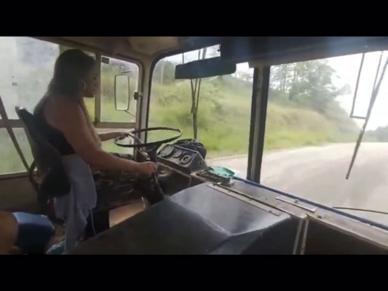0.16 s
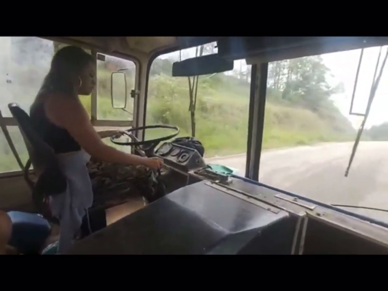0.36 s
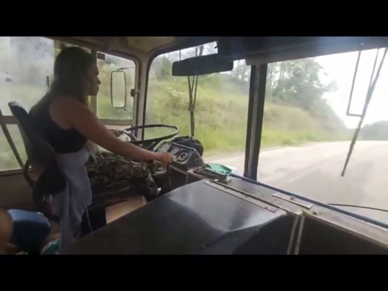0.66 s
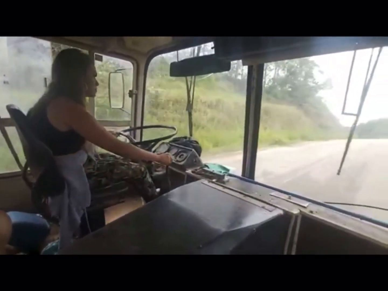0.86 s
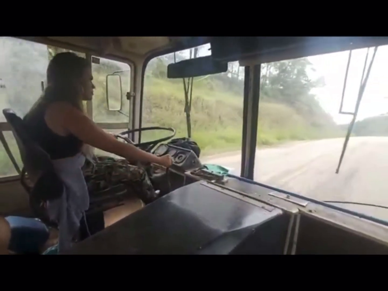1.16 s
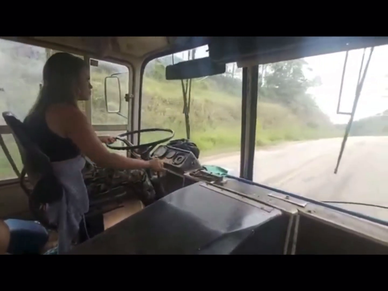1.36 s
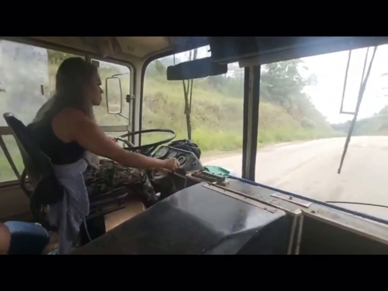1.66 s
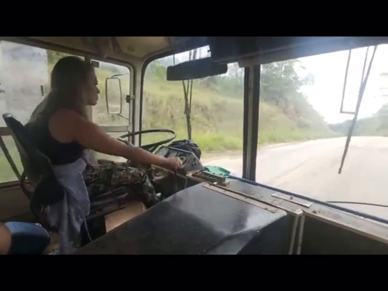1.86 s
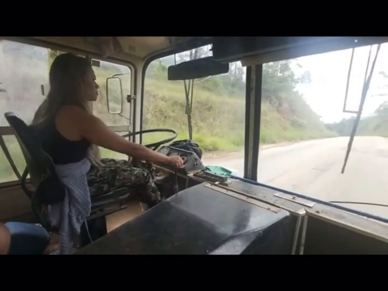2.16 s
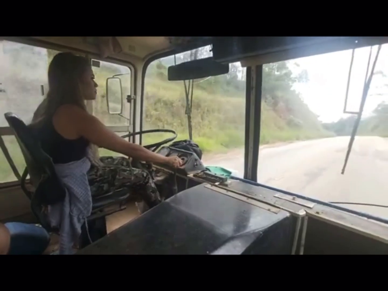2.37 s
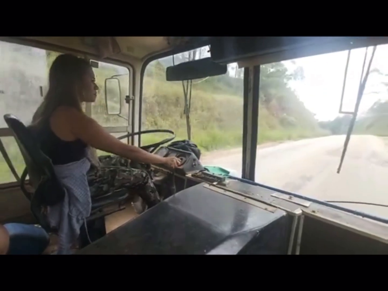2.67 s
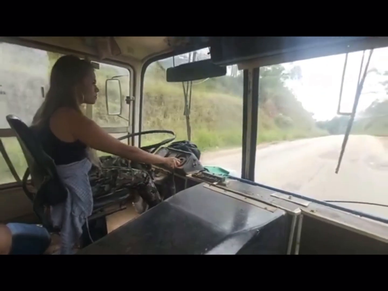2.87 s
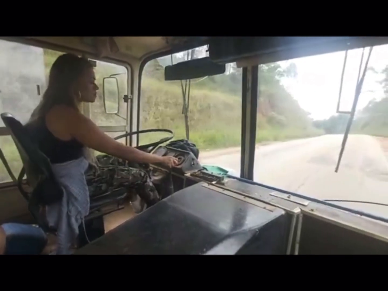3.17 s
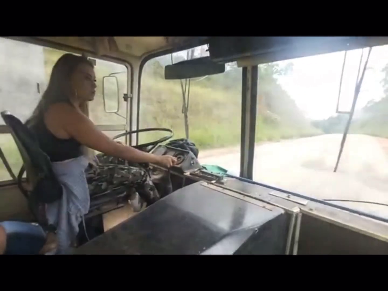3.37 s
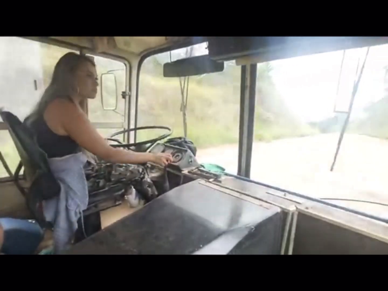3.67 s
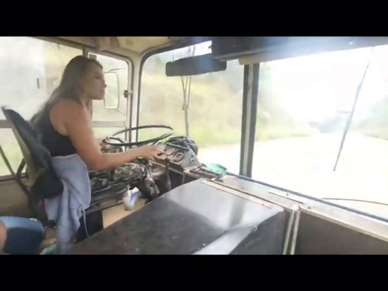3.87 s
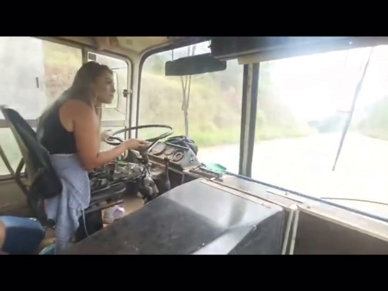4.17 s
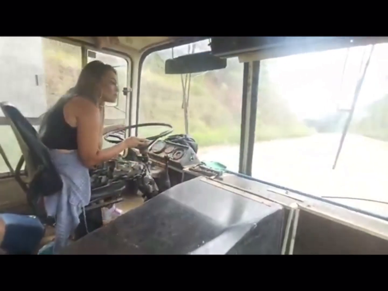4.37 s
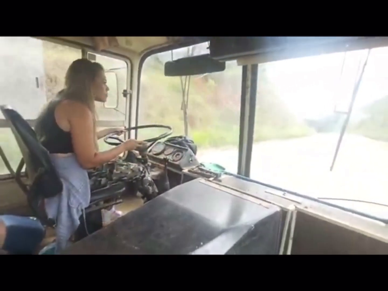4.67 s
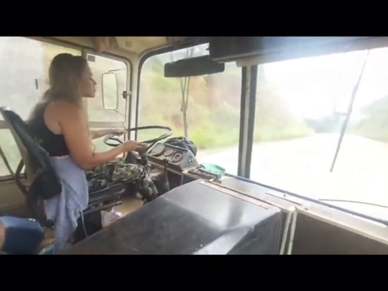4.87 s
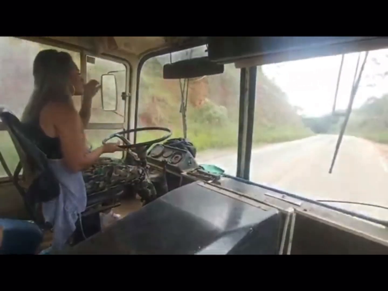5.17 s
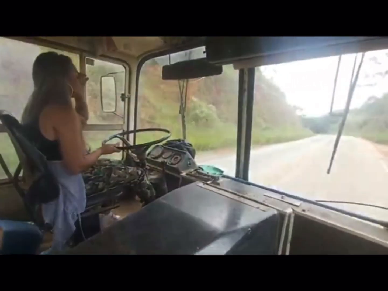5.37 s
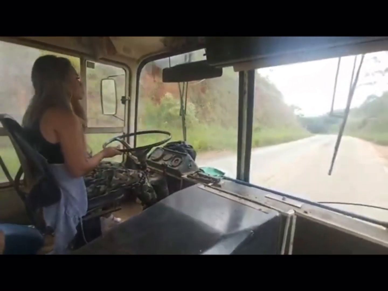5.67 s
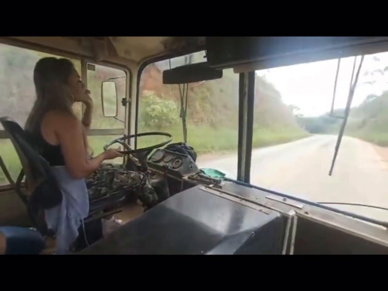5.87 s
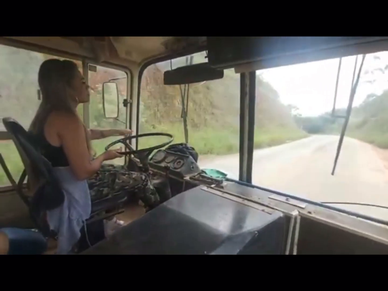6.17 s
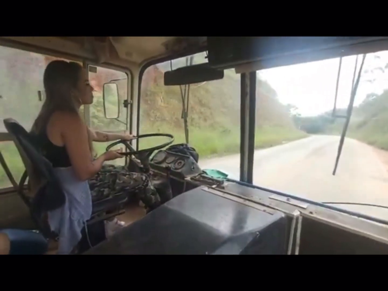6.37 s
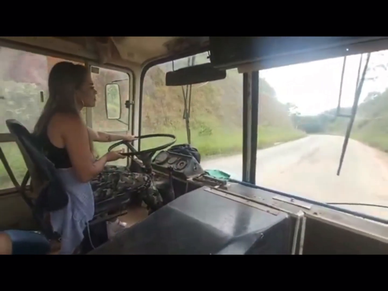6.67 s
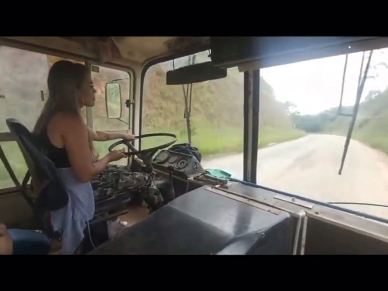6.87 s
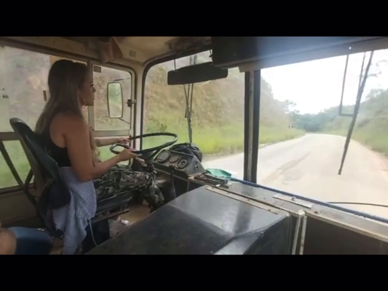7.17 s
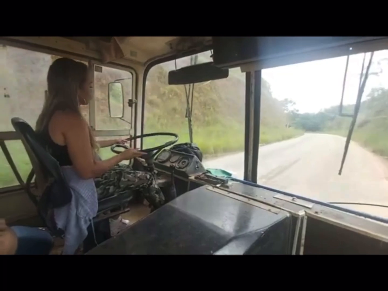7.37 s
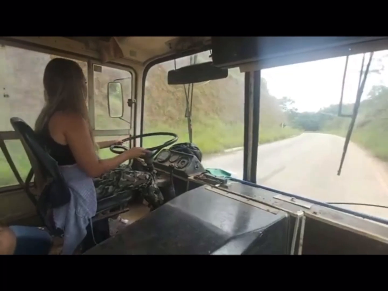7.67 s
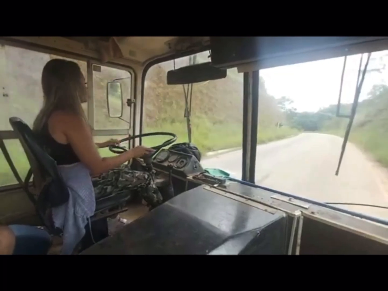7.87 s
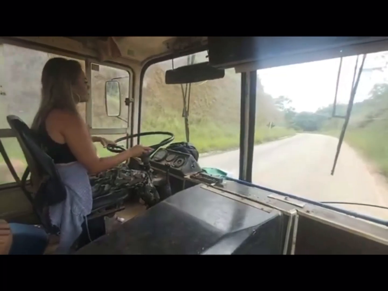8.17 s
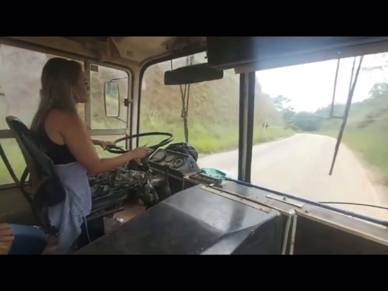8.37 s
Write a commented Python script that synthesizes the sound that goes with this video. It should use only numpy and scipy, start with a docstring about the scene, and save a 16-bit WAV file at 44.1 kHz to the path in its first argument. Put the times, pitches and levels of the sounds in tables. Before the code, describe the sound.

An old bus engine drones and clatters beside the listener in a boomy cab. Its pitch falls for about two seconds, nearly idling, then jumps up as drive returns and slowly rises, louder and rougher. Ruts thump through the floor, a panel clangs midway, and fittings, windows and airy trim rattle above constant road rumble. Close interior stereo pickup with deep bass and diffuse treble.

```python
"""Inside the cab of an old six-cylinder diesel bus on a rough road: the revs fall for a gear change,
the engine takes up the load again and pulls slowly faster. Engine orders are sines that swell at cab
resonances; knock is noise bursts at the firing rate under a resonant cover. Fan, tyres and trim are shaped
noise; ruts and panes ring decaying modes; fittings clatter in noise bursts; faint narrow tones come and go."""
import sys
import numpy as np
from scipy import signal
from scipy.fft import rfft, irfft
from scipy.io import wavfile
from scipy.ndimage import uniform_filter1d

SR = 44100
rng = np.random.default_rng(int(sys.argv[2]) if len(sys.argv) > 2 else 0)


def waveform_to_disk(signal):
    """Save audio, clipped to [-1, 1], as 16-bit WAV at the path in sys.argv[1]."""
    frames = np.transpose(np.atleast_2d(signal))
    scaled = np.clip(frames, -1, 1) * 32767
    samples = np.round(scaled).astype(np.int16)
    wavfile.write(sys.argv[1], SR, samples)


N = 375291
TIME = np.arange(N) / SR  # s
HZ = np.fft.rfftfreq(N, 1 / SR)

# Engine speed falls for the gear change, flares, settles as the clutch bites, then climbs.
# Each row: time in seconds, engine cycles per second (six firings make a cycle).
ENGINE_SPEED = [(0, 18.33), (.2, 17.89), (.6, 14.6), (1, 11.91), (1.25, 10.41), (1.5, 9.35), (1.75, 8.59),
                (2, 7.5), (2.15, 7.6), (2.3, 10.2), (2.5, 11.85), (2.66, 12.1), (2.8, 10.6), (3.03, 10.25),
                (3.3, 10.9), (4.3, 11.67), (6.3, 13.38), (7.3, 14.4), (7.9, 14.94), (8.51, 15.7)]
# The pedal lifts for the gear change and goes down again. Each row: time in seconds, engine load in dB.
ENGINE_LOAD = [(0, -4.5), (.36, -9), (.7, -11), (1.35, -20.5), (1.6, -14), (2.0, -13.5), (2.2, -3.5),
               (2.45, 1.5), (2.7, 1), (4.5, -0.5), (7.0, 0.95), (8.15, 1.6), (8.51, 0)]
# How hard the road shakes the bus. Each row: time in seconds, shaking in dB.
ROAD_SHAKE = [(0, 1), (.4, 1), (.56, -3.5), (1.3, -2), (1.6, 1), (2.15, -1), (2.55, 1), (3.2, 0), (3.9, 1),
              (4.3, 1), (5.5, 2.3), (6.5, 0), (7.5, 0.5), (8.51, 2.4)]
# Engine orders, the strong ones and those that uneven cylinders fill in, at 0 dB load and cruising speed.
# Each row: multiple of the cycle rate, rms level off resonance in dB, dB per dB of load,
# dB per doubling of speed.
ENGINE_ORDERS = [(3, -45, .3, 22), (6, -35.5, 0, 12), (7, -37, .8, 0), (8, -39, .5, 5), (9, -35, 0, 13),
                 (10, -39, .8, 0), (11, -40, .8, 0), (12, -37, .1, 0), (14, -43, .5, 8),
                 (15, -36.5, .4, -3), (17, -41, .8, 3), (18, -39.5, .4, 5), (20, -43, .8, 5),
                 (21, -40, .7, -4), (23, -39, .9, -2), (24, -43, .8, 0), (25, -42, .7, 3), (26, -44, .7, 4),
                 (28, -42, .7, -4), (30, -41, .7, 0)]
# Air resonances of the cab; a negative lift is a dead spot.
# Each row: centre in Hz, width in Hz, lift in dB, lowest order driven, highest order driven.
CAB_MODES = [(82.5, 5, 8, 6, 6), (87, 3, -10, 6, 6), (92.5, 7, 9, 6, 7), (91, 6, 5, 7, 7),
             (107, 13, 9.5, 6, 6), (108, 11, 13, 8, 8), (114, 5, 7, 9, 9), (128.5, 8, 11.5, 9, 9),
             (139, 6, 7.5, 9, 9), (123.5, 6, 12, 10, 10), (130, 9, 10, 10, 10), (137, 5, 8, 10, 10),
             (128.5, 6, 12, 11, 11), (137, 22, 12, 11, 11), (125, 14, 16, 12, 12), (134.5, 6, 7.5, 12, 12),
             (143, 10, 15.5, 12, 12), (149.5, 4, 5, 12, 12), (178, 22, 7, 12, 12), (168, 18, 12, 15, 15),
             (199, 8, 9, 18, 18), (229, 16, 6, 15, 21), (249, 11, 14, 23, 24), (286, 11, 14, 21, 21),
             (289, 9, 12.5, 23, 23), (298, 7, 12, 25, 28), (305, 14, 18.5, 23, 23), (323, 7, 13, 23, 23),
             (408, 22, 11, 26, 30), (411, 12, 6.5, 30, 30)]
# Spectrum of the knock. Each row: frequency in Hz, relative level in dB per Hz.
KNOCK_SPECTRUM = [(60, -39), (150, -0.5), (250, 5), (400, 2.5), (580, -2), (1000, 0), (1450, -5.5),
                  (2000, -6.5), (3000, -11), (4000, -22), (5500, -24.5), (9000, -25), (15000, -47)]
# Resonances of the engine cover. Each row: centre in Hz, width in Hz, lift in dB.
COVER_MODES = [(748, 22, 4.5), (835, 12, 8.5), (952, 84, -2.5), (1082, 120, 3), (1219, 78, 7),
               (1348, 55, 5.5), (1456, 67, 1.5), (1666, 44, 7.5), (1850, 110, 7.5), (2040, 120, 6),
               (2194, 51, 3.5), (2506, 27, 9.5), (2720, 45, 3.5)]
# Spectrum of the cooling fan. Each row: frequency in Hz, relative level in dB per Hz.
FAN_SPECTRUM = [(100, -11), (500, -8), (1100, -20), (2100, 3.5), (2800, 6.5), (3500, -1), (4300, -1),
                (5500, -5.5), (9000, -43), (15000, -36)]
# Spectrum of the tyre and body rumble. Each row: frequency in Hz, relative level in dB per Hz.
ROAD_SPECTRUM = [(15, -32), (30, -23), (46, -8), (70, -5), (100, 0), (135, -1.5), (200, -7.5), (300, -8),
                 (430, -11.5), (900, -20), (2000, -26), (4000, -31.5), (8000, -43), (11500, -45),
                 (15000, -55)]
# Ruts that thump through the floor.
# Each row: start in seconds, peak level in dB, hardness in dB per octave.
FLOOR_THUMPS = [(1.208, -15, -8), (1.622, -10, 6), (1.696, -15, -4), (1.796, -12, 0), (2.508, -7, 4),
                (3.019, -9, 2), (3.793, -8, 7), (4.152, -13, 12), (4.222, -6, 5), (4.317, -12, 14),
                (4.654, -5.5, 5), (4.831, -11, 14), (5.078, -11, -2), (5.332, -10, 26), (5.403, -9, -13),
                (5.528, -11, 4), (5.746, -6, -1), (6.399, -9, -3), (6.496, -11, -2), (6.615, -12, 2),
                (6.76, -14, 5)]
# Modes of the floor. Each row: frequency in Hz, level before the hardness tilt in dB,
# 60 dB decay time in seconds.
FLOOR_MODE_TABLE = [(58, -22, 0.075), (85, 3.5, 0.14), (128, 14.5, 0.053), (218, 1.5, 0.054)]
# Loose fittings that clatter on bumps.
# Each row: start in seconds, level before a common trim in dB, centre in Hz, 60 dB decay time in seconds.
FITTING_CLATTERS = [(0.4, -25, 11400, 0.15), (1.108, -32, 3800, .06), (1.25, -33, 4500, 0.074),
                    (1.518, -31, 4200, .06), (1.552, -35, 7000, .2), (1.607, -28, 4500, .08),
                    (1.641, -30, 3900, .06), (1.746, -34, 3900, .05), (1.778, -29, 3900, .05),
                    (1.8, -28, 4500, .1), (1.888, -34, 9000, .18), (1.957, -27, 4250, 0.066),
                    (2.256, -29, 3400, .06), (2.422, -27, 5000, .1), (2.482, -33, 8000, .2),
                    (2.551, -23, 4800, .1), (4.149, -18.5, 5540, 0.16), (4.152, -20, 1800, .07),
                    (4.188, -27, 5600, .15), (4.861, -31, 10000, .2), (5.025, -28, 8500, .2),
                    (5.634, -26, 7000, .16), (5.812, -26, 8500, 0.11), (5.885, -30, 8500, .1),
                    (6.291, -26, 6000, .1)]
# A loose metal part chinks while the engine coasts. Each row: start in seconds, level before trim in dB.
METAL_CHINKS = [(1.1294, -28), (1.3603, -28), (1.4661, -28), (1.688, -29), (1.8044, -29), (1.9305, -24),
                (2.0644, -29), (2.1969, -25)]
# Modes of the metal part. Each row: frequency in Hz, relative level in dB, 60 dB decay time in seconds.
METAL_MODES = [(1740, 1.5, 0.08), (1880, -6, .055), (2900, -12, 0.055)]
# A body panel rings on a bump and its rebound. Each row: start in seconds, level before trim in dB.
PANEL_BUMPS = [(4.15, -16), (4.199, -22.5)]
# Modes of the panel. Each row: frequency in Hz, relative level in dB, 60 dB decay time in seconds.
BODY_PANEL_MODES = [(530, -3, 0.46), (680, -4, 0.13), (810, 2, .13), (985, -5, 0.13), (1220, -6, .14)]
# Modes of the window panes.
# Each row: nominal frequency in Hz, relative level in dB, 60 dB decay time in seconds.
WINDOW_MODES = [(1800, -1, 0.062), (2850, -1, 0.049), (3900, -5, 0.031), (4510, -6, 0.056),
                (6820, -11, .03)]
# Spectrum of rushing air and trim. Each row: frequency in Hz, relative level in dB per Hz.
HISS_SPECTRUM = [(1500, -24), (3000, 6), (4300, 4), (5600, -0.5), (6900, 5.5), (8200, -5), (9000, -3),
                 (10500, -5), (11800, -2.5), (12900, -7.5), (15000, -17)]
# Brief resonances, low groans and thin whistles.
# Each row: start in seconds, length in seconds, centre in Hz, width in Hz, rms level before the fades in dB.
BRIEF_TONES = [(0, 0.37, 4240, 180, -44), (1.2, 0.18, 9100, 400, -55), (1.62, 0.49, 316, 8, -33.5),
               (1.89, 0.11, 280, 12, -26), (2.58, 0.27, 328, 11, -28), (2.7, 0.84, 7120, 130, -48),
               (2.4, 1.25, 250, 67, -25), (6.7, 0.54, 865, 32, -29), (6.72, 0.41, 1215, 47, -30.5),
               (7.75, 0.57, 1206, 91, -31)]
# Likeness of the two sides. Each row: frequency in Hz, left-right correlation.
LIKENESS = [(40, .95), (130, .96), (290, .7), (630, .42), (1300, -.1), (2500, .05), (14000, 0)]
# Balance of the two sides. Each row: frequency in Hz, left minus right in dB.
BALANCE = [(60, 6), (110, -1.5), (200, 3), (370, 0.5), (690, 1), (1260, 1), (2320, 4), (4270, 3.5),
           (7850, 3.5), (14400, -1)]

CRUISE = 12  # reference speed in engine cycles per s
# knock level at 0 dB load and cruising speed; it follows the load dB for dB
KNOCK_DB, KNOCK_DB_PER_DOUBLING = -20.5, 4.5
LOOSE = .45  # share of the knock's drive power that is fresh noise rather than repeated blows
SCATTER_DB = 1.7  # rms difference in strength from one blow to the next
ROAD_DB = -20.3  # rumble level at 0 dB shaking
# trim and windows rattle with the engine's load and speed and with the road
HISS_DB, HISS_PER_LOAD, HISS_PER_SHAKE, HISS_DB_PER_DOUBLING = -35, 1, 0.65, 3.5
# the panes chatter louder as the road gets rougher
PANES_DB, PANES_PER_SHAKE = -44, 1.5
EDGE_HZ = 14950  # upper band limit


def amp(db):
    """Level to pressure ratio: 20 dB is a factor of ten."""
    return 10 ** (np.asarray(db) / 20)


def evened(x):
    """Normalisation of mean power: the signal is scaled to rms 1."""
    return x / np.sqrt(np.mean(x ** 2) + 1e-20)


def read(points, hz=HZ):
    """Logarithmic frequency scale: a spectrum table is interpolated between its points."""
    f, value = np.transpose(points)
    return np.interp(np.log(hz + 1), np.log(f + 1), value)


def curve(table):
    """Linear interpolation: a time table becomes one value per sample."""
    s, value = np.transpose(table)
    return np.interp(TIME, s, value)


def add(mix, s, sound):
    """Superposition: a stereo sound is summed into the mix from time s in seconds."""
    part = mix[:, max(round(s * SR), 0):][:, :sound.shape[1]]
    part += sound[:, :part.shape[1]]


def wander(per_s):
    """Low-passed random process: smooth chance of about rms 1, changing about per_s times a second."""
    coarse = np.linspace(0, TIME[-1], 2048)
    f = np.fft.rfftfreq(len(coarse), coarse[1])
    slow = irfft(rfft(rng.standard_normal(len(coarse))) * np.exp(-(f / per_s) ** 2))
    return np.interp(TIME, coarse, evened(slow))


def lift(resonances, hz):
    """Resonance curves: the decibels that a set of modes adds at the given frequencies."""
    return sum(db / (1 + (2 * (hz - centre) / width) ** 2) for centre, width, db in resonances)


def in_cab(pair, colour_db):
    """Interaural coherence: bass is much alike on both sides, treble is diffuse and mostly leans left."""
    a, b = rfft(pair)
    same = np.clip(read(LIKENESS), -1, 1)
    lean = amp(read(BALANCE) / 2)
    mid = a * np.sqrt((1 + same) / 2)
    side = b * np.sqrt((1 - same) / 2)
    sides = np.array([(mid + side) * lean, (mid - side) / lean])
    return evened(irfft(sides * amp(colour_db), N))


def boom(cycles, speed, load_db):
    """Order excitation: multiples of the cycle rate drone, swelling as they glide through cab resonances."""
    out, doublings = np.zeros((2, N)), np.log2(speed / CRUISE)
    for k, db, per_load, per_doubling in ENGINE_ORDERS:
        driven = [mode for *mode, lowest, highest in CAB_MODES if lowest <= k <= highest]
        # a resonance takes time to build, so a quick glide passes through it smoothly
        swell_db = uniform_filter1d(np.zeros(N) + lift(driven, k * speed), size=8000)
        line_db = db + per_load * load_db + per_doubling * doublings + swell_db
        # higher orders arrive less in step at the two sides (phase in radians)
        apart = k / 60 * rng.choice([-1, 1]) * np.array([[1], [-1]])
        line = np.sqrt(2) * np.sin(2 * np.pi * (k * cycles + rng.random()) + apart)
        waver_db = .7 * wander(4)
        out += amp(line_db + waver_db) * line
    return out * amp([[.7], [-.7]])  # slightly stronger on the left


def knock(cycles, ring_s=0.015, uneven_db=0.28, burst=0.58, count=6):
    """Impulsive excitation: cylinders strike the block, each with its own ring, amid combustion noise."""
    firing = np.floor(cycles * count).astype(int)
    at = np.flatnonzero(np.diff(firing)) + 1
    strength = amp(uneven_db * evened(rng.standard_normal(count)))
    force = amp(SCATTER_DB * rng.standard_normal(N))[at]
    t = np.arange(4096) / SR
    blows = np.zeros((2, N))
    for cylinder in range(count):
        train = np.zeros(N)
        train[at] = force * strength[cylinder] * (firing[at] % count == cylinder)
        # worn injectors and pistons make each cylinder knock a little late
        age = np.maximum(t - rng.uniform(0, .006), 0)
        # the ring swells in a moment and dies away in two parts, the weaker one a little sooner
        rise = 1 - np.exp(-age / 0.0027)
        decay = np.exp(-age / ring_s) + 0.12 * np.exp(-age / 0.013)
        ring = rng.standard_normal((2, len(t))) * rise * decay
        blows += signal.oaconvolve(train[None], ring, axes=1)[:, :N]
    blows = signal.sosfilt(signal.butter(2, 260, "high", fs=SR, output="sos"), blows)
    # steady noise plus a puff that fades over the fraction "burst" of a firing interval
    phase = cycles * count % 1
    puffs = rng.standard_normal((2, N)) * strength[firing % count] * (2.1 + np.exp(-phase / burst))
    drive = np.sqrt(1 - LOOSE) * evened(blows) + np.sqrt(LOOSE) * evened(puffs)
    return cover_wavers(in_cab(drive, read(KNOCK_SPECTRUM) + lift(COVER_MODES, HZ)))


def cover_wavers(pair, waver_db=1.5, per_s=7):
    """Modal fluctuation: each resonance of the engine cover's loose panels rises and sinks in its own time."""
    hz, t, z = signal.stft(pair, SR, nperseg=1024)
    bands = np.array([lift([(centre, width, 1)], hz) for centre, width, _ in COVER_MODES])
    swells = rng.standard_normal((len(COVER_MODES), len(t)))
    smooth = np.exp(-(np.fft.rfftfreq(len(t), t[1]) / per_s) ** 2)
    swells = evened(irfft(rfft(swells) * smooth, len(t)))
    wavered = z * amp(waver_db * bands.T @ swells)
    return evened(signal.istft(wavered, SR, nperseg=1024)[1][:, :N])


def fan(speed, top_db=-30, steepness=3.4):
    """Aerodynamic noise: the cooling fan's rush grows as a steep power of engine speed."""
    gain = amp(top_db) * (speed / speed.max()) ** steepness
    return gain * in_cab(rng.standard_normal((2, N)), read(FAN_SPECTRUM))


def thumps(rise_s=0.0043):
    """Modal response to a push: ruts make low floor modes throb; hardness tilts the balance of the modes."""
    out, t = np.zeros((2, N)), np.arange(SR // 4) / SR
    for s, peak_db, hardness in FLOOR_THUMPS:
        ring = np.zeros(len(t))
        for hz, db, t60 in FLOOR_MODE_TABLE:
            mode_db = db + hardness * np.log2(hz) - 60 * t / t60
            ring += amp(mode_db) * np.sin(2 * np.pi * hz * t)
        ring *= 1 - np.exp(-t / rise_s)
        add(out, s, amp(peak_db) * np.array([ring, ring]) / abs(ring).max())
    return out


def road(jolt_db=1.47):
    """Random excitation: the uneven surface jolts the rumble of tyres and body."""
    jolted = rng.standard_normal((2, N)) * amp(jolt_db * wander(19.6))
    return in_cab(jolted, read(ROAD_SPECTRUM))


def clatters(octaves=0.53, level_db=-2):
    """Band-limited impact noise: each loose fitting gives a quickly dying burst around its own centre."""
    out, t = np.zeros((2, N)), np.arange(SR // 2) / SR
    f = np.fft.rfftfreq(len(t), 1 / SR) + 1
    for s, db, hz, t60 in FITTING_CLATTERS:
        band = np.exp(-(np.log2(f / hz) / octaves) ** 2 / 2)
        burst = evened(irfft(rfft(rng.standard_normal((2, len(t)))) * band, len(t)))
        rise = 1 - np.exp(-t / .004)
        add(out, s, burst * amp(db + level_db - 60 * t / t60) * rise)
    return out


def struck(hits, modes, level_db):
    """Free vibration: every hit rings the same few decaying modes, with chance phases on each side."""
    out, t = np.zeros((2, N)), np.arange(SR) / SR
    for s, db in hits:
        ring = np.zeros((2, len(t)))
        for hz, mode_db, t60 in modes:
            phase = rng.uniform(-0.89, 1, (2, 1))  # radians
            ring += amp(mode_db - 60 * t / t60) * np.sin(2 * np.pi * hz * t + phase)
        add(out, s, amp(db + level_db) * ring * (1 - np.exp(-t / 0.0011)))
    return out


def metal_chinks():
    """Free vibration of a small part: short, high modes make a loose metal part chink."""
    return struck(METAL_CHINKS, METAL_MODES, level_db=-2.5)


def panel_rings():
    """Free vibration of a plate: a body panel rings longer and lower after a bump and its rebound."""
    return struck(PANEL_BUMPS, BODY_PANEL_MODES, level_db=-1)


def panes(per_s=75, size_db=6.0, detune=0.047):
    """Random impacts on resonators: panes chatter in uneven ticks, each ringing one pane's split mode."""
    out, t = np.zeros((2, N)), np.arange(2048) / SR
    for hz, db, t60 in WINDOW_MODES:
        struck_now = rng.random(N) < per_s / len(WINDOW_MODES) / SR
        ticks = struck_now * amp(size_db * np.minimum(rng.exponential(1, N), 2))
        # two neighbouring partials on each side
        pair = hz * (1 + detune * rng.uniform(-1.28, 1, (2, 2, 1)))
        ring = np.sin(2 * np.pi * pair * t).sum(1) * amp(db - 60 * t / t60)
        out += signal.oaconvolve(ticks[None], ring, axes=1)[:, :N]
    return evened(out)


def hiss(per_s=70, size_db=4, decay_s=0.011, rattle=0.81, flutter_db=1.5, count=4):
    """Modulated noise: rushing air and tiny rattles of windows and trim, each part in its own band."""
    out = np.zeros((2, N))
    centres = np.log(np.geomspace(3000, 13000, count))
    for share in np.eye(count):
        ticks = (rng.random(N) < per_s / SR) * amp(size_db * np.minimum(rng.exponential(1, N), 2.7))
        power = signal.lfilter([1], [1, -np.exp(-1 / (decay_s * SR))], ticks ** 2)
        power = abs(uniform_filter1d(power, size=480))  # echoes in the cab soften each tick
        part = rng.standard_normal((2, N)) * np.sqrt(1 + rattle * power / power.mean())
        band_power = np.interp(np.log(HZ + 1), centres, share)
        out += irfft(rfft(part) * np.sqrt(band_power), N)
    return in_cab(out * amp(flutter_db * wander(10.0)), read(HISS_SPECTRUM))


def tones():
    """Narrow-band noise: brief groans and whistles swell and fade around their centres."""
    out = np.zeros((2, N))
    for s, length, hz, width, db in BRIEF_TONES:
        count = int(length * SR)
        band = np.exp(-(2 * (np.fft.rfftfreq(count, 1 / SR) - hz) / width) ** 2)
        tone = evened(irfft(rfft(rng.standard_normal((2, count))) * band, count))
        add(out, s, amp(db) * tone * signal.windows.tukey(count, .6))
    return out


def scene():
    """Superposition of sources: speed and load set the engine's levels, shaking those of road and panes."""
    speed, load_db, shake_db = curve(ENGINE_SPEED), curve(ENGINE_LOAD), curve(ROAD_SHAKE)
    cycles = np.cumsum(speed * (1 + .002 * wander(6))) / SR  # the speed is slightly unsteady
    doublings = np.log2(speed / CRUISE)
    knock_db = KNOCK_DB + load_db + KNOCK_DB_PER_DOUBLING * doublings
    engine = boom(cycles, speed, load_db) + amp(knock_db) * knock(cycles) + fan(speed)
    rumble = amp(ROAD_DB + shake_db) * road()
    rattles = clatters() + metal_chinks() + panel_rings()
    chatter = amp(PANES_DB + PANES_PER_SHAKE * shake_db) * panes()
    hiss_db = HISS_DB + HISS_PER_LOAD * load_db + HISS_PER_SHAKE * shake_db
    hiss_db = hiss_db + HISS_DB_PER_DOUBLING * doublings
    return engine + thumps() + rumble + rattles + chatter + amp(hiss_db) * hiss() + tones()


def record(dry):
    """Saturation and band limiting: the highest peaks are rounded off, then a steep low-pass follows."""
    rounded = dry / (1 + (dry / .95) ** 8) ** (1 / 8)
    low_pass = signal.firwin(511, EDGE_HZ, window=("kaiser", 9), fs=SR)
    return signal.oaconvolve(rounded, low_pass[None], "same")


dry = scene()
out = record(dry)
waveform_to_disk(out)
```